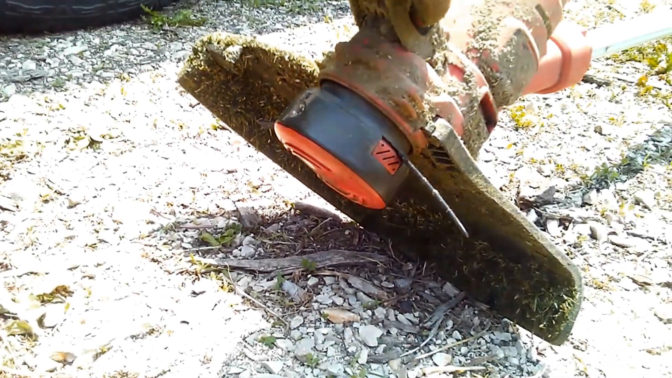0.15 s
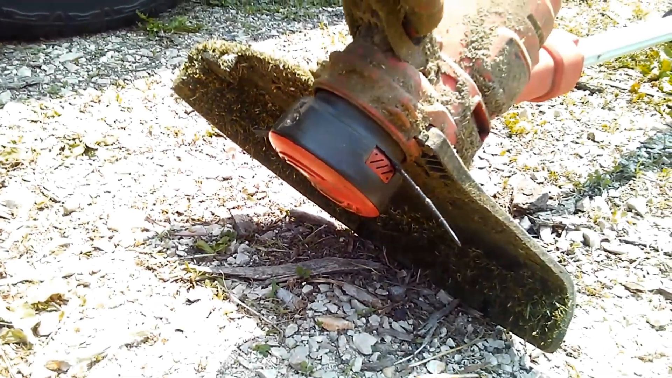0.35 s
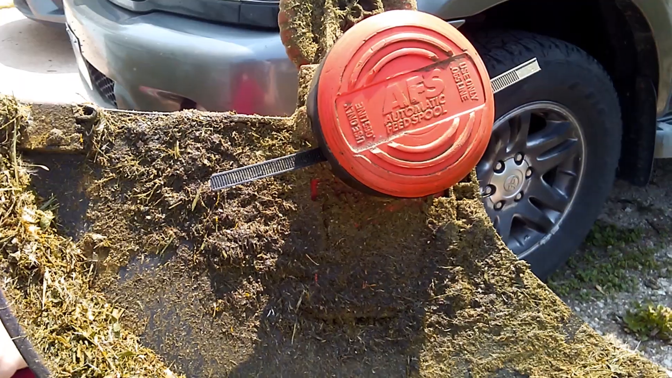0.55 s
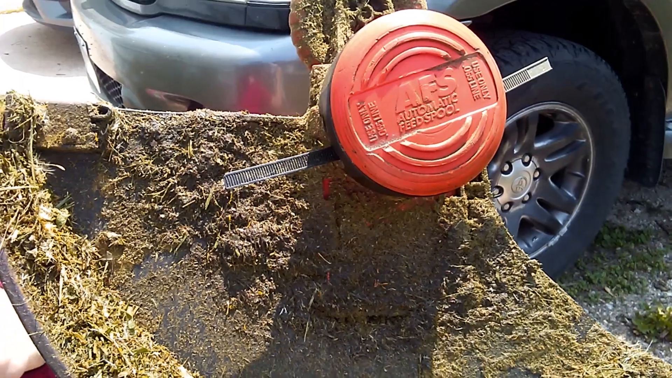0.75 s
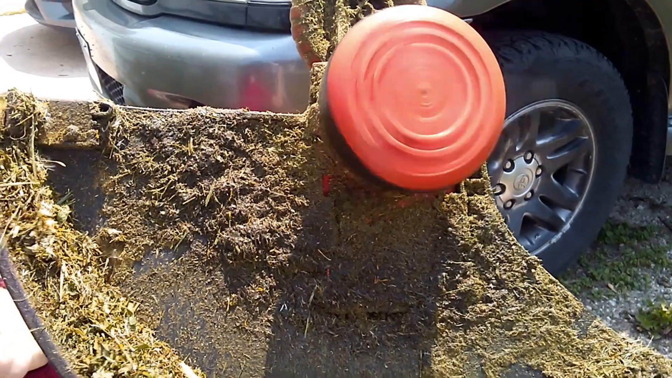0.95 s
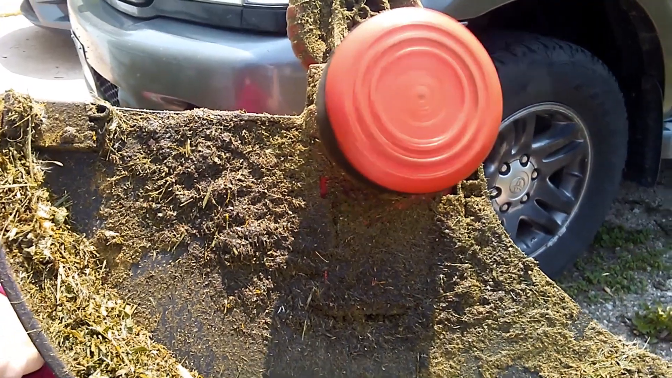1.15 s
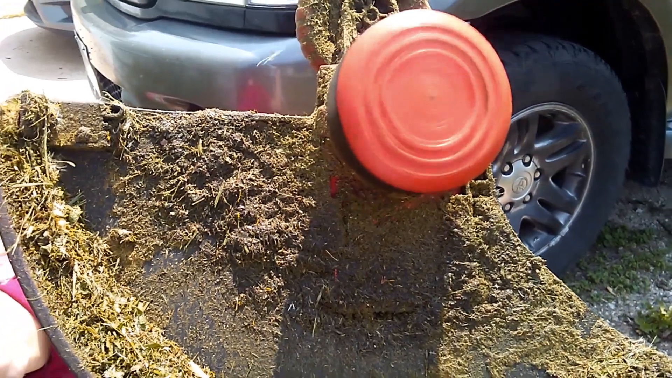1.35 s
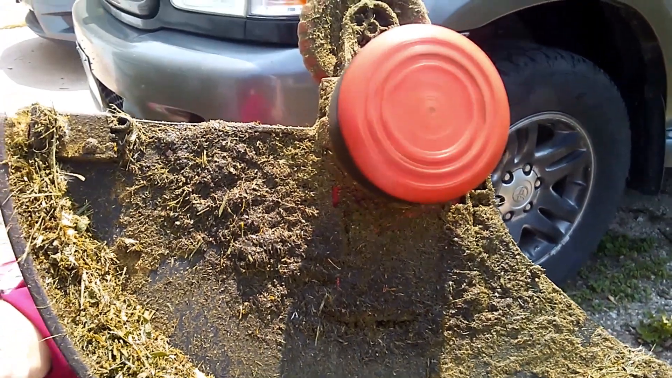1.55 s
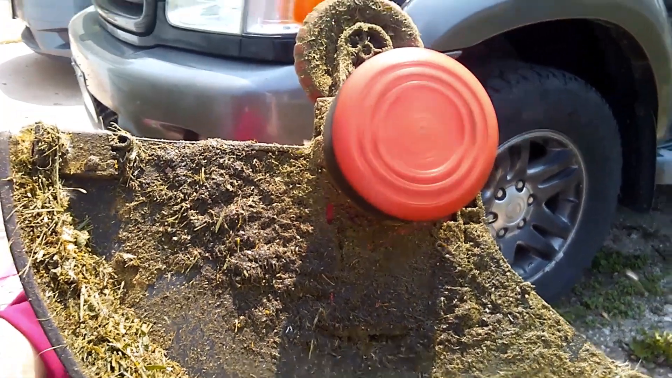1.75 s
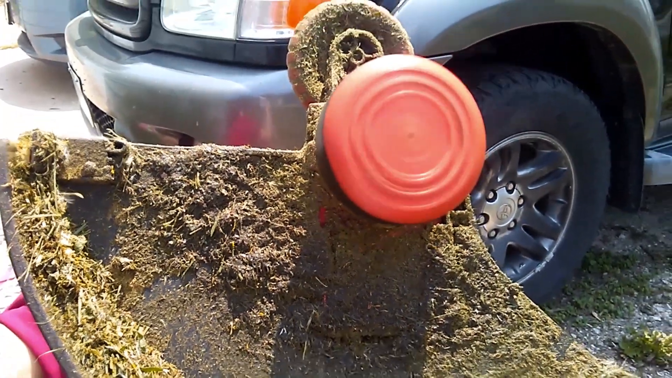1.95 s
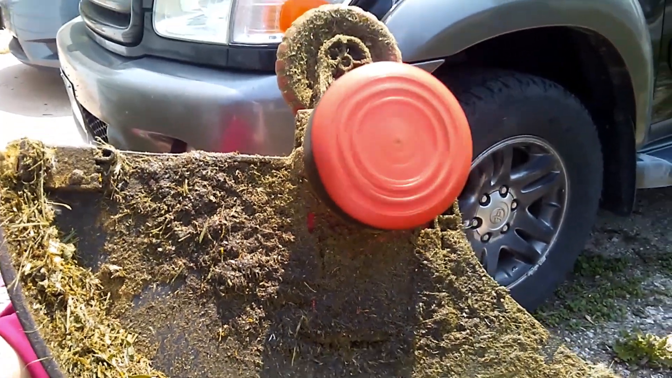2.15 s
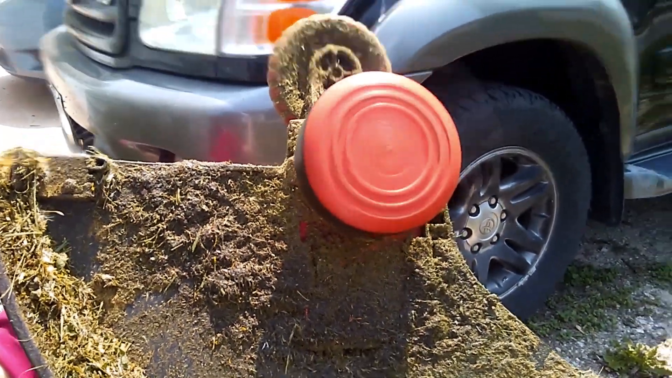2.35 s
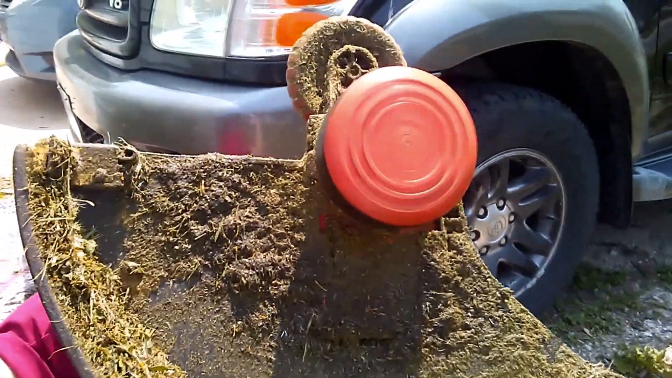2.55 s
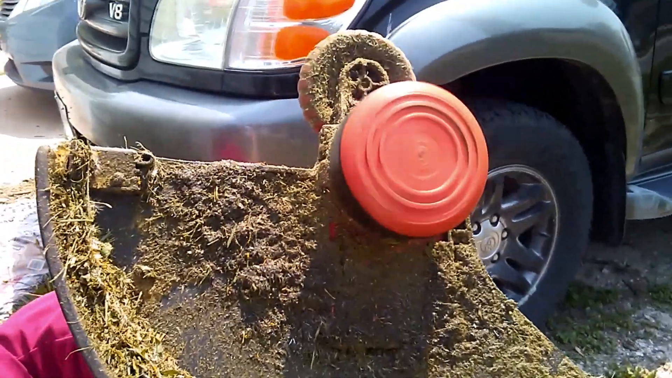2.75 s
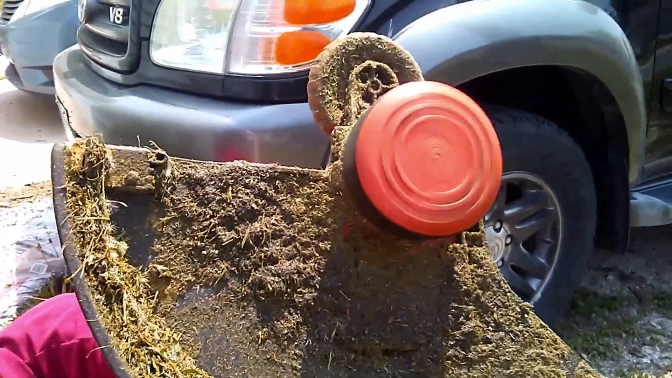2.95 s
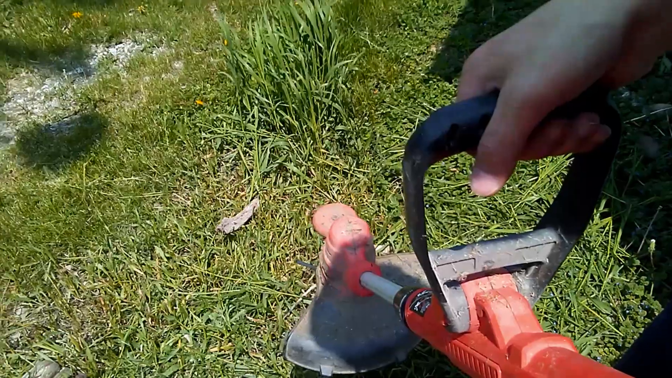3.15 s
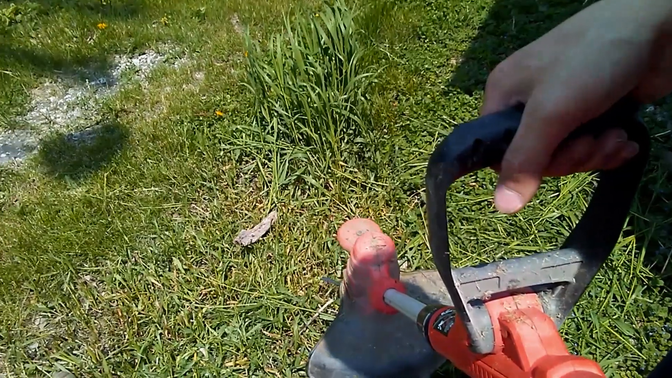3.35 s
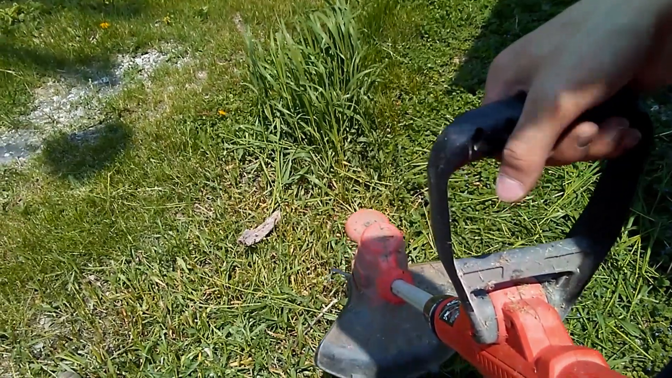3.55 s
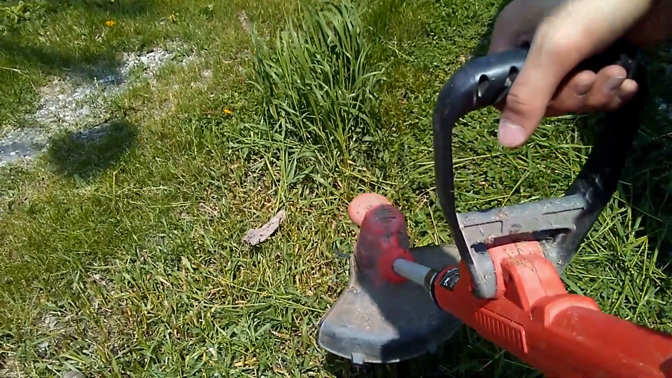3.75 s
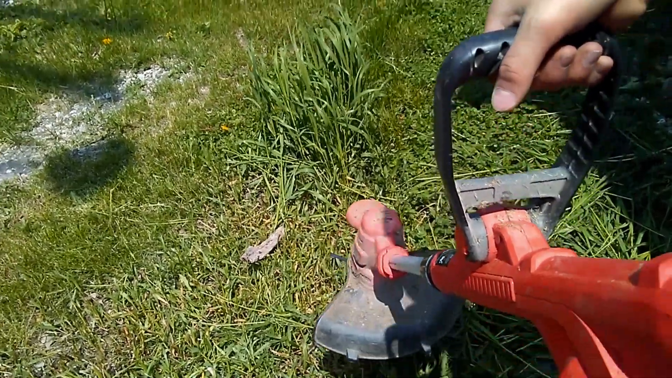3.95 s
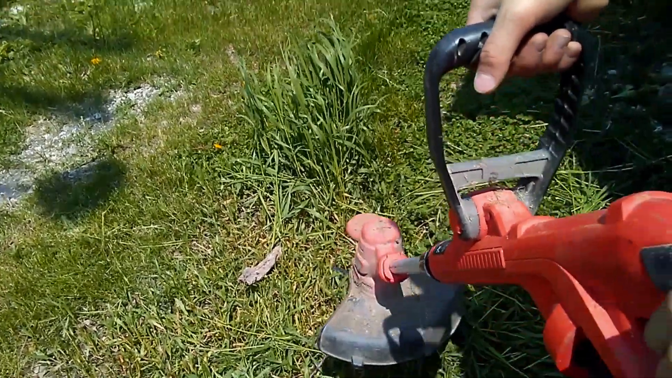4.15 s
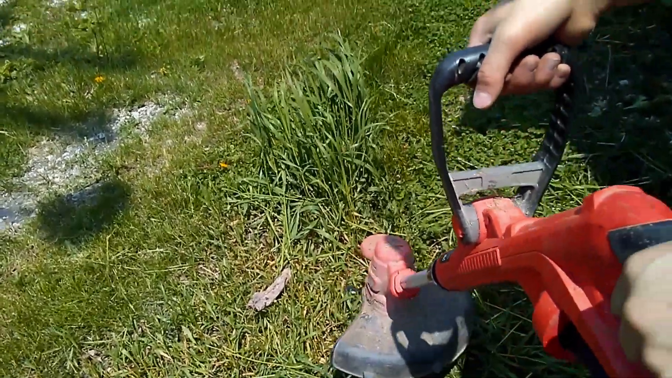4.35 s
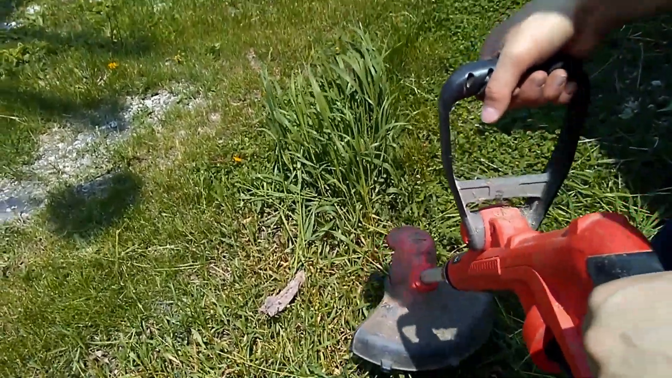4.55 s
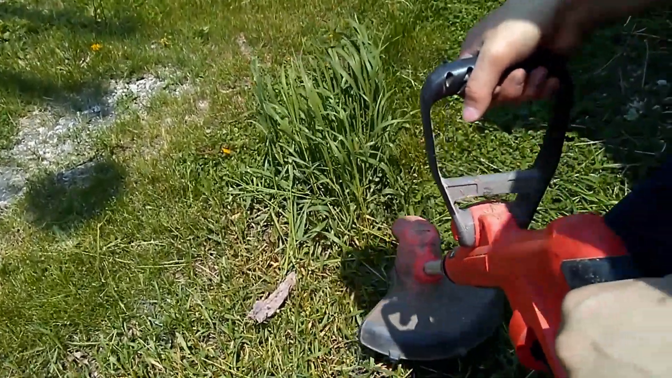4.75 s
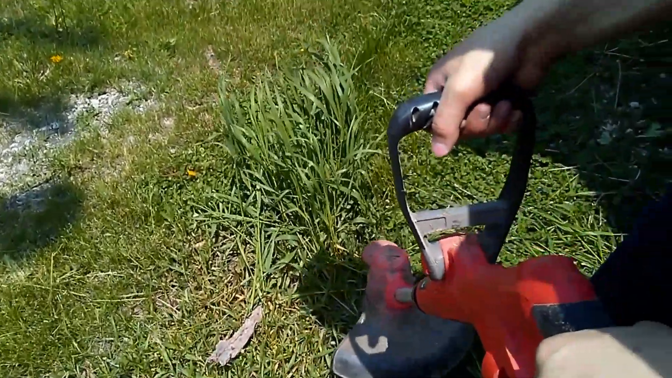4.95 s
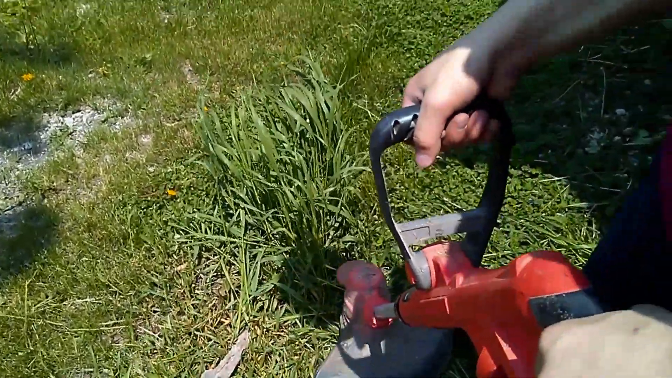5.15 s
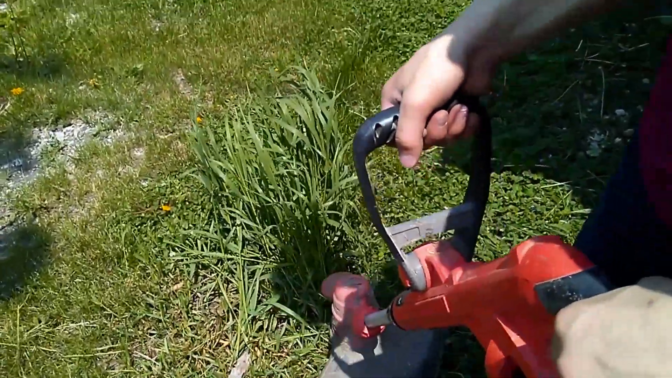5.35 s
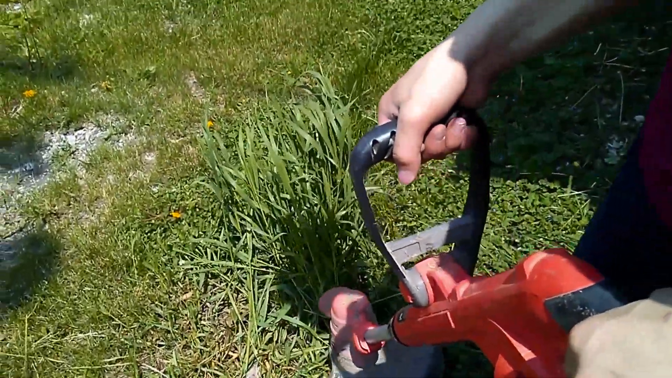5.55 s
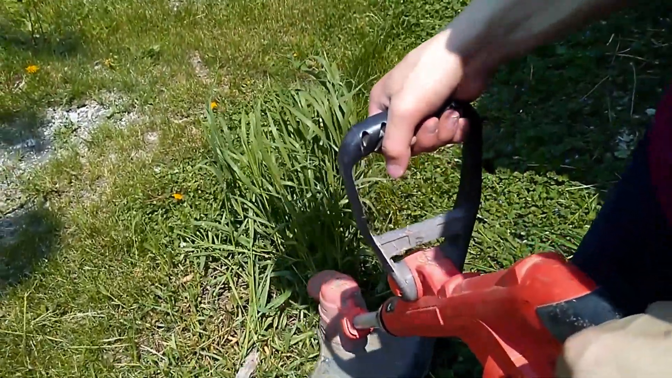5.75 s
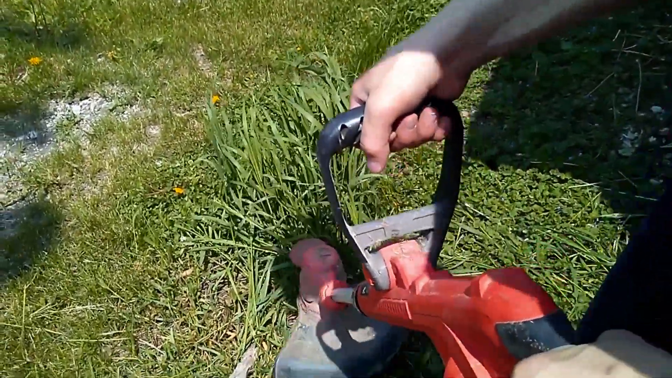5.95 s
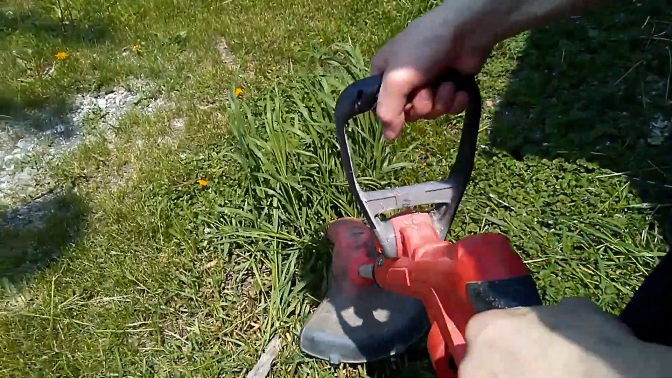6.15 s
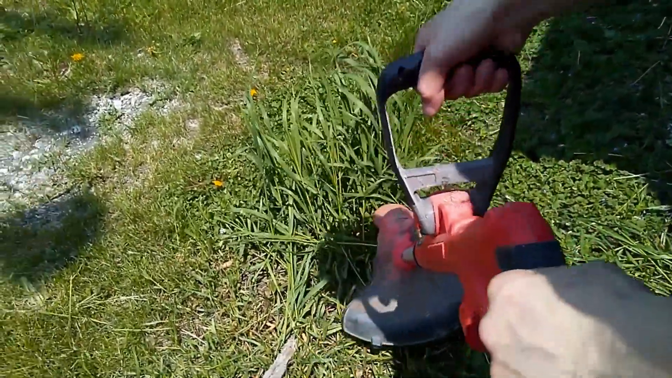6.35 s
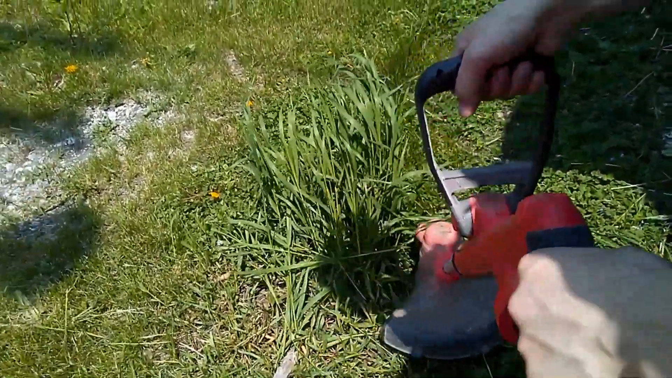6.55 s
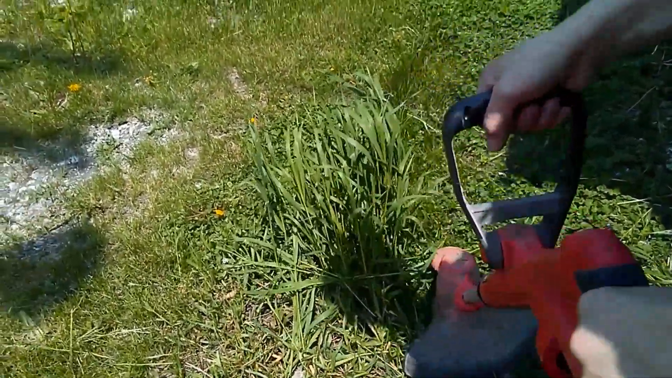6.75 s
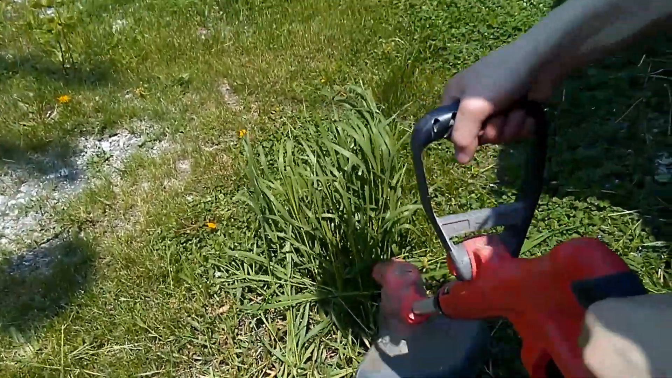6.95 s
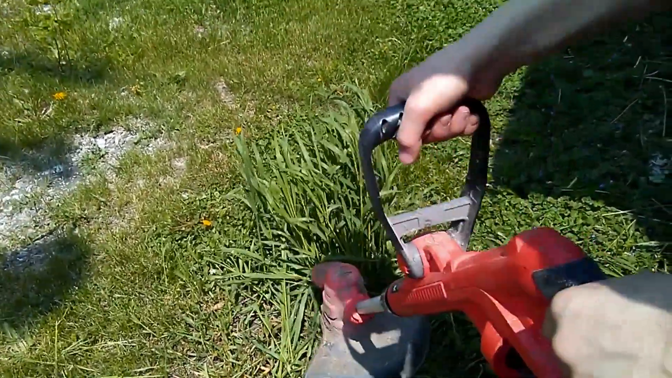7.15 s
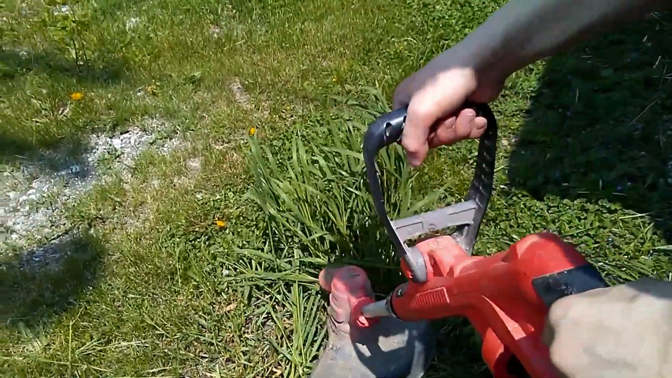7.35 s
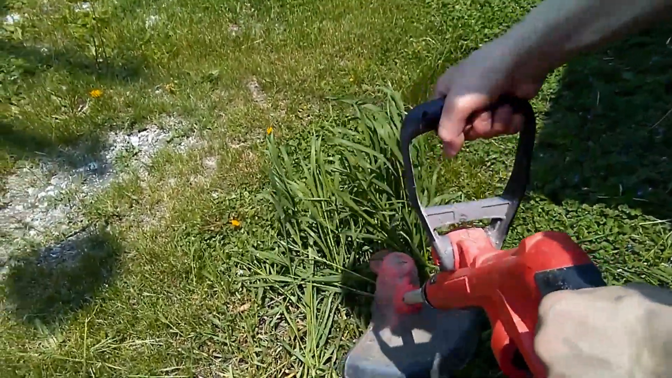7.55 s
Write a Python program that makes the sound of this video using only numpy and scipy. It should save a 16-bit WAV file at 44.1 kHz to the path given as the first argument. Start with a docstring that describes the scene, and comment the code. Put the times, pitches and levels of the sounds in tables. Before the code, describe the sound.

A close, dry recording of an electric grass trimmer in open air. After a scrap of quiet birdsong and a silent gap, the motor whirs up to a harsh, bright buzz, then winds down and stops abruptly. Birds chirp over soft air noise while the plastic handle knocks and clicks. A second start brings a brief low hum, a fast rising whine, and a steady, rough, rushing drone until the end.

```python
"""A scrap of birdsong on a lawn, then silence; an electric string trimmer spins up close by, coasts down, is cut off.
Birds and clicks of its plastic handle follow; the trimmer starts again, coloured differently, and runs on to the end.
Head and geared motor whine as tones; line and cooling fan tear the air into a broad hiss, chopped by the line ends.
Clicks are decaying shell modes, birds gliding sines with an echo, the lawn coloured noise."""
import sys
import numpy as np
from scipy import signal
from scipy.fft import rfft, irfft, next_fast_len
from scipy.io import wavfile
from scipy.ndimage import uniform_filter1d, minimum_filter1d

SR = 44100
rng = np.random.default_rng(int(sys.argv[2]) if len(sys.argv) > 2 else 0)


def master_out(mix):
    """Clip the mix to full scale and print it as 16-bit PCM to the path in sys.argv[1]."""
    frames = np.transpose(np.atleast_2d(mix))
    ceiling = np.clip(frames, -1, 1)
    pcm = np.round(ceiling * 32767).astype(np.int16)
    wavfile.write(sys.argv[1], SR, pcm)


N = 335390


def undb(db):
    """dB to gain."""
    return 10 ** (np.asarray(db) / 20)


def walk(rate_hz):
    """Random levels held 1 / rate_hz and slewed twice; spread near 1."""
    hold = int(SR / rate_hz)
    steps = np.repeat(rng.standard_normal(N // hold + 1), hold)
    return 1.045 * uniform_filter1d(uniform_filter1d(steps, hold), hold)[:N]


def follow(table):
    """Columns of a table that starts with t/s, interpolated to every sample."""
    t_s, *columns = np.transpose(table)
    return [np.interp(np.arange(N) / SR, t_s, column) for column in columns]


def gate(start_s, end_s, edge_s=0.00061):
    """1 between two times, with linear edges."""
    t = np.arange(N) / SR
    return np.clip(np.minimum(t - start_s, end_s - t) / edge_s, 0, 1)


def ramp(hz, from_hz, to_hz):
    """0 at the first frequency, 1 at the second, straight on a log axis."""
    return np.clip(np.log(hz / from_hz) / np.log(to_hz / from_hz), 0, 1)


def bands(table, flicker_db, rate_hz, count=3):
    """Coloured noise, rms 1 before flicker, as (centre Hz, signal); count bands an octave flicker alone."""
    size = next_fast_len(N)
    place = count * np.log2(np.fft.rfftfreq(size, 1 / SR) + 1)
    hz, db = np.transpose(table)
    knots = count * np.log2(hz)
    spectrum = rfft(rng.standard_normal(size)) * undb(np.interp(place, knots, db, -150, -150))
    spectrum /= np.std(irfft(spectrum, size))
    for centre in np.arange(np.floor(knots[0]), knots[-1] + 1):
        share = np.clip(1 - np.abs(place - centre), 0, 1)
        band = irfft(spectrum * share, size)[:N]
        yield 2 ** (centre / count), band * undb(flicker_db * walk(rate_hz))


def rough_tone(hz, width_hz):
    """Narrow noise around a moving centre, rms near 1."""
    phase = 2 * np.pi * np.cumsum(hz) / SR
    in_phase, quadrature = walk(width_hz)[:len(hz)], walk(width_hz)[:len(hz)]
    return in_phase * np.cos(phase) + quadrature * np.sin(phase)


# trimmer runs: t/s, head turns f/Hz, hiss level/dB, low and high line whistle level/dB re hiss, guard f/Hz
# the trigger is let go at 1.75 s
RUN_CURVES = [
    [(0.99, 58.26, -37, -13, -12, 2744), (1.03, 70.9, -29.5, -12, -17, 2700),
     (1.09, 90.2, -23, -12, -26, 2570), (1.15, 105.5, -18.5, -6.5, -14, 2580),
     (1.24, 120.6, -17, 0, -10, 2610), (1.32, 130.8, -13.5, 1, -7, 2580), (1.5, 145.1, -12, 1, -5, 2580),
     (1.61, 150.4, -10.5, -1, -6, 2550), (1.75, 153.6, -11, 2.5, -7, 2550),
     (1.9, 145.3, -11, -13, -23, 2690), (2.26, 121.1, -14.5, -37, -49, 2630),
     (2.6, 104.3, -16.5, -39.5, -51.5, 2600), (3.02, 86.97, -20, -48.5, -53.5, 2590)],
    [(4.73, 56.4, -29, -47, -53, 2370), (4.76, 61, -24.5, -48, -52, 2410),
     (4.85, 84.5, -23.5, -44, -42, 2440), (4.89, 90.8, -21.5, -34, -46, 2390),
     (4.98, 111.8, -22, -37, -31, 2330), (5.05, 120.6, -19.5, -33, -31, 2320),
     (5.17, 132.7, -19, -23, -23, 2370), (5.28, 142.5, -15.5, -27, -22.5, 2470),
     (5.52, 149.1, -14, -25, -21.5, 2550), (5.72, 152.8, -13, -26.5, -22, 2530),
     (5.87, 157.6, -13.5, -18.5, -19.5, 2440), (6.27, 162.1, -14.5, -23.5, -16.5, 2340),
     (6.53, 160.8, -13, -28, -17.5, 2420), (6.63, 160.9, -12.5, -28, -18, 2480),
     (6.79, 159.8, -13, -24.5, -22, 2360), (7.32, 161.2, -12.5, -26, -25.5, 2620),
     (7.61, 161, -12.5, -27, -25, 2400)],
]
# per run: rumble gain/dB, guard level/dB re hiss, chop depth/dB; each (at full speed, added per octave slower)
SPEED_MIX = [
    [(1, 4.9), (-16, 4.9), (-0.5, 2.74)],
    [(0.5, 3.5), (-3, -4), (0.97, 0.9)],
]
# tool turned about, per run: t/s, gain of the upper rush level/dB, whistle peak f/Hz
TURNING = [
    [(.99, -7, 5300), (1.3, 1, 5230), (2, 1, 5250), (3.02, -1, 5400)],
    [(4.73, -4, 5650), (5.1, -8.5, 5450), (5.5, -4, 5420), (5.82, -7.5, 5400), (5.95, -9, 5850),
     (6.7, -9, 5870), (7.05, -9.5, 5600), (7.3, -9.5, 6020), (7.61, -9.5, 5900)],
]
FULL_HZ = 160  # full speed of the head


def trimmer(run):
    """Tones on head and motor orders, over air noise that each passing line end chops."""
    hz, hiss_db, low_db, high_db, guard_hz = follow(RUN_CURVES[run])
    upper_db, peak_hz = follow(TURNING[run])
    slower_oct = np.log2(FULL_HZ / hz)
    bass_db, guard_db, chop_db = (full + slope * slower_oct for full, slope in SPEED_MIX[run])
    turn = 2 * np.pi * np.cumsum(hz * (1 + .0015 * walk(30))) / SR
    start_s, end_s = RUN_CURVES[run][0][0], RUN_CURVES[run][-1][0]
    # tones grow out of the noise as the parts come up to speed
    tones = whine(run, hz, slower_oct, turn) * gate(start_s, N / SR + 1, edge_s=0.18) ** 2
    air = rush(run, bass_db, upper_db, guard_db, guard_hz) + whistle(run, low_db, high_db, peak_hz)
    return gate(start_s, end_s) * (tones + chop(turn, chop_db) * undb(hiss_db) * air)


GEAR = 3.63  # motor turns per head turn
# tone orders, multiples of the head turns: head, then motor
TONE_ORDERS = [1, 2, 3, 4, 6, GEAR, 2 * GEAR, 3 * GEAR]
# per run, one row per order: full-speed level/dB, loss per octave slower/dB
TONE_LEVELS = [
    [(-30.5, 22), (-20.5, 27.5), (-29, 24), (-24.5, 12.5), (-24.5, 29.5), (-25, 17), (-25.5, 19.5),
     (-26, 2.5)],
    [(-45.5, 28.5), (-26, 37), (-39.5, 23), (-25.5, 22.5), (-41.5, 6.5), (-27.5, 23.5), (-31.5, 34.5),
     (-21.5, 26)],
]
# housing lifts or mutes tones sweeping through: f/Hz, half-width/Hz, gain/dB
HOUSING_BANDS = [(514, 43, 9), (1050, 60, 2), (1450, 90, 7), (1596, 150, -10)]
WAVER_DB = 0.2152  # level wander per order


def whine(run, hz, slower_oct, turn):
    """Head and motor harmonics, coloured by housing resonances."""
    out = 0
    for order, (full_db, slope_db) in zip(TONE_ORDERS, TONE_LEVELS[run]):
        lift_db = sum(gain_db / (1 + ((order * hz - f) / width_hz) ** 2) for f, width_hz, gain_db in HOUSING_BANDS)
        wander_db = 0.61 * walk(25) + WAVER_DB * order * walk(16)
        level_db = full_db - slope_db * slower_oct + lift_db + wander_db
        out += np.sqrt(2) * undb(level_db) * np.sin(order * turn)
    return out


def chop(turn, depth_db):
    """Two line ends pass per turn, one a little longer, no two passes alike."""
    return undb(depth_db * (np.cos(2 * turn) + 0.77 * np.cos(turn) + 0.89 * walk(250)))


# hiss colour per run: f/Hz, relative level/dB per Hz
RUSH_COLOUR = [
    [(60, -49.5), (120, -30.5), (250, -20.5), (450, -9.5), (750, -15), (1000, -6.5), (1500, -8),
     (2200, -3.5), (2750, -0.5), (3300, -5.5), (4100, -9), (4400, -33)],
    [(60, -50), (120, -45), (250, -19.5), (450, -9.5), (700, -6), (900, -13.5), (1300, -2.5), (2000, 0.5),
     (2550, 2), (2950, -2), (4000, -2), (4400, -31.5)],
]


def rush(run, bass_db, upper_db, guard_db, guard_hz):
    """Broad torn air with housing rumble; the guard's hollow lifts a band that shifts as the tool tilts."""
    out = undb(guard_db) * rough_tone(guard_hz, 600)
    for f, band in bands(RUSH_COLOUR[run], 1.37, 9, count=5):
        out += band * undb(bass_db * ramp(f, 3000, 780) + upper_db * ramp(f, 2400, 3590))
    return out


# line whistle colour per run: f/Hz, relative level/dB per Hz; the microphone dips near 8 kHz
WHISTLE_COLOUR = [
    [(4000, -14), (4300, -4), (4700, -5.5), (5300, -6.5), (6000, -5), (6700, -14.5), (7300, -26.5),
     (7700, -38.5), (8200, -48.5), (8700, -38.5), (9400, -34.5), (10200, -51)],
    [(4000, -15.5), (4300, 4), (4900, -5.5), (5400, -7), (5900, -5), (6400, -4), (7300, -12), (7700, -27.5),
     (8200, -37), (8700, -22), (9400, -28), (10200, -57)],
]
# per run: whistle peak level/dB re high whistle
WHISTLE_PEAK_DB = [-6.5, -2]


def whistle(run, low_db, high_db, peak_hz):
    """Air torn by the line: flickering noise bands and one moving narrow peak."""
    out = undb(high_db + WHISTLE_PEAK_DB[run]) * rough_tone(peak_hz, 600)
    for f, band in bands(WHISTLE_COLOUR[run], 2.2, 12, count=6):
        out += band * undb(low_db + (high_db - low_db) * ramp(f, 5176, 5350))
    return out


# rough glides as the fan gathers speed: t/s, length/s, first f/Hz, last f/Hz, width/Hz, mid-glide level/dB
WHIR_GLIDES = [(0.988, 0.052, 2900, 3100, 510, -26), (1.077, 0.067, 4870, 6430, 1120, -26),
               (4.782, 0.068, 2500, 3180, 330, -22), (4.856, 0.047, 3390, 3940, 152, -29),
               (4.87, .1, 4700, 6000, 904, -50), (4.981, .7, 1229, 1440, 219.8, -23)]


def whirs():
    """Fan air noise in narrow rising bands, swelling and fading."""
    out = np.zeros(N)
    for t_s, length_s, first_hz, last_hz, width_hz, db in WHIR_GLIDES:
        i, u = int(t_s * SR), np.linspace(0, 1, int(length_s * SR))
        glide_hz = first_hz + (last_hz - first_hz) * u
        out[i:i + len(u)] += undb(db) * np.sin(np.pi * u) * rough_tone(glide_hz, width_hz)
    return out


# hum partials: multiple of HUM_HZ, rms level/dB
HUM_PARTIALS = [(2, -51.5), (3, -44), (4, -38)]
HUM_HZ, HUM_START_S, HUM_S = 119, 4.73, 0.162


def hum():
    """Short steady low tones as the motor takes current at the second start."""
    t = np.arange(N) / SR
    tones = sum(np.sqrt(2) * undb(db) * np.sin(2 * np.pi * k * HUM_HZ * t) for k, db in HUM_PARTIALS)
    return tones * gate(HUM_START_S, HUM_START_S + HUM_S, edge_s=0.017)


# handle clicks: listed t/s, peak level/dB before filters, shell f/Hz, upper-mode gain/dB
HANDLE_CLICKS = [(3.177, -5.5, 417, -13.5), (3.289, -23, 486, -11), (3.894, -39, 525, -7),
                 (3.914, -36, 468, -12), (3.934, -40, 545, -17), (3.962, -32, 538, -12),
                 (3.988, -30, 535, -15), (4.004, -40, 503, -11.5), (4.419, -33, 511, -12),
                 (4.514, -33.5, 501, -31), (4.543, -34, 415, -7.5), (4.571, -34.5, 441, -21),
                 (4.619, -43, 450, -19), (4.676, -38, 530, -12), (4.725, -28, 564, -5)]
# upper shell modes: nominal f/Hz, level/dB re shell tone before upper-mode gain, t60/s
SHELL_MODES = [(1220, 9, 0.013), (1600, 11.5, 0.0032), (2360, 10, 0.0066), (3100, -24, .006)]
SHELL_T60_S = .018
KNOCK_DELAY_S = 0.00272  # each knock sounds this long after its listed time


def handle():
    """Short knocks into the decaying modes of the plastic shell, dull above 4 kHz."""
    out, t = np.zeros(N), np.arange(3000) / SR
    for listed_s, db, shell_hz, bright_db in HANDLE_CLICKS:
        ring = np.sin(2 * np.pi * shell_hz * t) * undb(-60 * t / SHELL_T60_S)
        for f, mode_db, t60_s in SHELL_MODES:
            mode_hz = f * (1 + 0.096 * rng.standard_normal())
            ring -= undb(mode_db + bright_db) * np.sin(2 * np.pi * mode_hz * t) * undb(-60 * t / t60_s)
        i = int((listed_s + KNOCK_DELAY_S) * SR)
        out[i:i + len(t)] += undb(db) * ring / np.abs(ring).max()
    out = signal.sosfilt(signal.butter(2, 200, "high", fs=SR, output="sos"), out)
    return signal.sosfilt(signal.ellip(7, 1.5, 70, 3700, fs=SR, output="sos"), out)


# bird notes: t/s, length/s, first f/Hz, last f/Hz, rasp 0-1, amplitude level/dB re 2
BIRD_NOTES = [(0.048, 0.046, 3900, 3500, 0.9, -59.5), (.15, 0.082, 3560, 3600, 0.7, -68),
              (0.399, 0.05, 3950, 3460, 0.8, -54.5), (0.43, 0.024, 3100, 3020, .3, -59),
              (3.07, 0.059, 4120, 2820, 0.1, -55), (3.228, 0.062, 3620, 3420, 0.94, -53),
              (3.37, .08, 3160, 3140, 0.4, -57), (3.646, .03, 3930, 3880, 0.4, -52),
              (3.502, .015, 2190, 2700, 0.2, -50), (3.52, 0.041, 4240, 4170, 0.3, -46),
              (3.578, 0.019, 3100, 2190, 1, -46), (3.62, .07, 4700, 6900, 0.4, -75),
              (3.749, .025, 2980, 4600, 0.55, -45.5), (3.774, 0.038, 3940, 2890, 0.55, -36.5),
              (3.898, 0.065, 5200, 5500, 0.45, -64), (4.05, .06, 5800, 4400, .3, -73),
              (4.109, 0.034, 3920, 3900, 0.46, -46.5), (4.466, 0.03, 4200, 3540, 0.4, -57),
              (4.561, 0.033, 3700, 3840, 0.04, -52)]


def birds():
    """Gliding whistles; rasp is a fast flutter of the level; a decaying noise echo follows."""
    out, flutter = np.zeros(N), walk(500)
    for t_s, length_s, first_hz, last_hz, rasp, db in BIRD_NOTES:
        i, u = int(t_s * SR), np.linspace(0, 1, int(length_s * SR))
        phase = 2 * np.pi * np.cumsum(first_hz + (last_hz - first_hz) * u) / SR
        shape = np.sqrt(np.sin(np.pi * u)) * (1 - rasp + rasp * flutter[i:i + len(u)])
        out[i:i + len(u)] += 2 * undb(db) * shape * np.sin(phase)
    t = np.arange(6000) / SR
    echo = rng.standard_normal(len(t)) * undb(-60 * t / 0.34)  # t60 0.34 s
    return out + undb(-35.5) * signal.fftconvolve(out, echo)[:N]


# open-air colour of each quiet stretch: f/Hz, relative level/dB per Hz
AIR_COLOUR = [
    [(24, -34), (40, -14), (258, -7), (299, -9.5), (664, -11), (836, -8), (909, -9.5), (2590, -14.5),
     (3480, -14), (6000, -49), (7800, -79), (13200, -120)],
    [(35, -55), (60, -28), (129, -13), (343, -6), (395, -10), (502, -0.5), (692, -7), (1010, -6.5),
     (1480, -8), (2170, 2), (2930, -6), (3810, -3.5), (4120, -10), (4470, -32), (7230, -35), (9400, -75.5),
     (15900, -120)],
]
# quiet stretches: start t/s, end t/s, air level/dB
QUIET_STRETCHES = [(0, 0.448, -62), (3.015, 4.735, -52.5)]


def lawn():
    """Birds over coloured open-air noise, heard only in the quiet stretches."""
    call, out = birds(), 0
    for (start_s, end_s, db), colour in zip(QUIET_STRETCHES, AIR_COLOUR):
        air = sum(band for _, band in bands(colour, 1.0, 22.68, count=2))
        out += gate(start_s, end_s) * (call + undb(db) * air)
    return out


def scene():
    """Two trimmer runs between quiet lawn sound; a silent gap comes before the first run."""
    tool = sum(trimmer(run) for run in range(len(RUN_CURVES)))
    return (tool + whirs() + hum() + handle() + lawn())[None]


KNEE, CEILING, LIMIT = .79, .87, 1.0  # amplitudes; the ceiling applies before the shaving is smoothed
TICK_DB, TOP_HZ = -16.5, 15800


def record(dry):
    """The microphone drops deep bass; a limiter holds the level, peaks are rounded; faint hiss; top cut."""
    dry = signal.sosfilt(signal.butter(4, 105, "high", fs=SR, output="sos"), dry)
    need = minimum_filter1d(np.minimum(1, LIMIT / (np.abs(dry) + 1e-9)), size=601)
    held = dry * uniform_filter1d(uniform_filter1d(need, size=300), size=300)
    over = np.maximum(np.abs(held) - KNEE, 0) / (CEILING - KNEE)
    shaved = np.sign(held) * (CEILING - KNEE) * (over - np.tanh(over))
    thud = uniform_filter1d(uniform_filter1d(shaved, size=5), size=6)
    rounded = held - thud - undb(TICK_DB) * shaved  # the direct share leaves a faint tick
    hiss = undb(-84) * rng.standard_normal(N) * (1 - gate(.447, .992))  # absent in the silent gap
    return signal.sosfilt(signal.ellip(8, .2, 70, TOP_HZ, fs=SR, output="sos"), rounded + hiss)


dry = scene()
out = record(dry)
master_out(out)
```